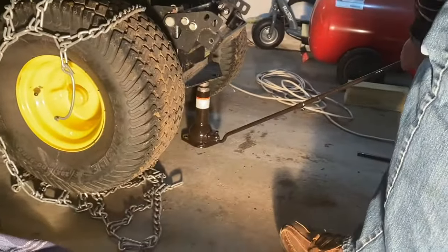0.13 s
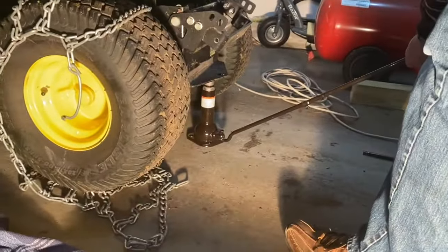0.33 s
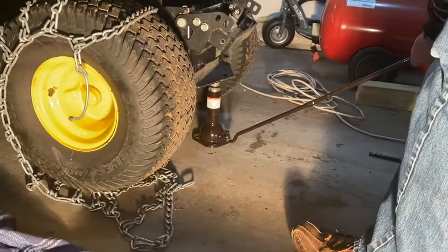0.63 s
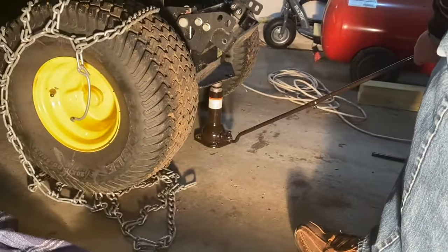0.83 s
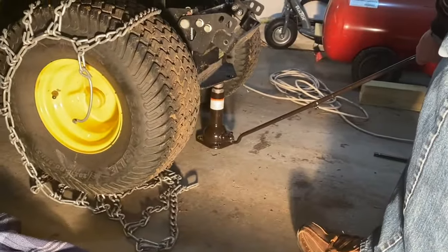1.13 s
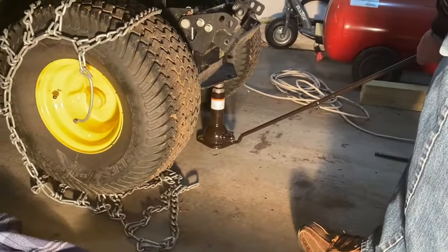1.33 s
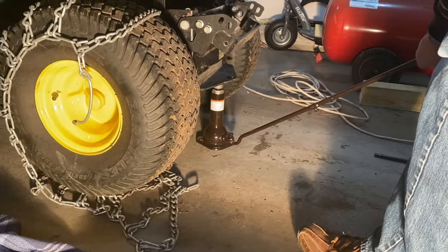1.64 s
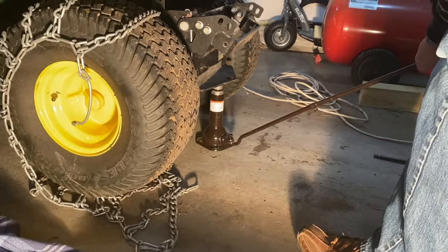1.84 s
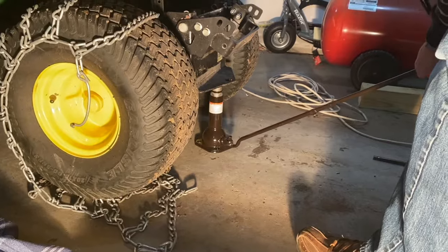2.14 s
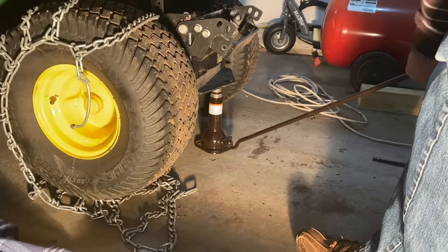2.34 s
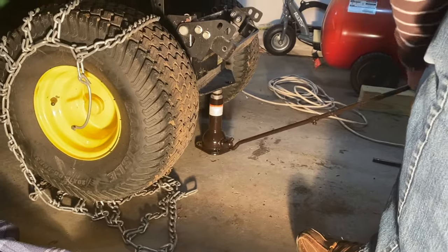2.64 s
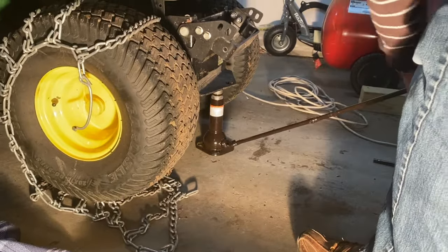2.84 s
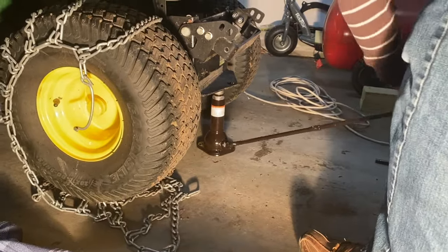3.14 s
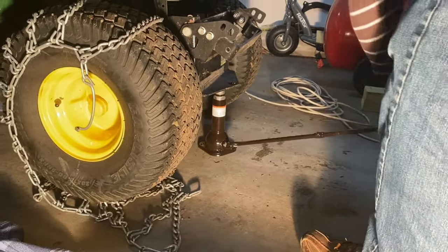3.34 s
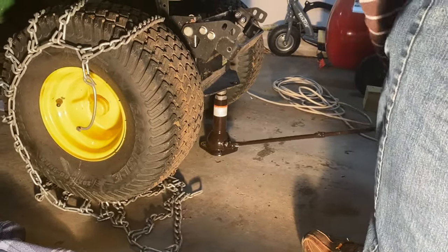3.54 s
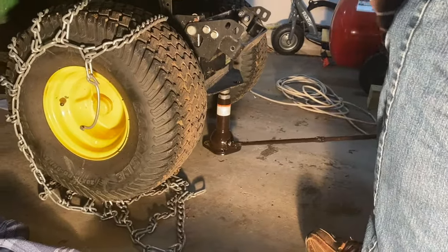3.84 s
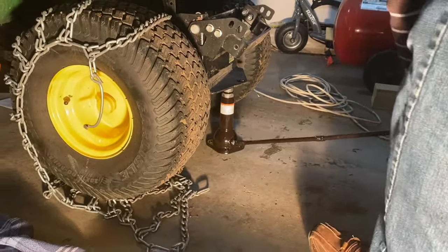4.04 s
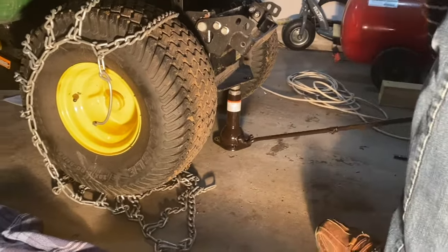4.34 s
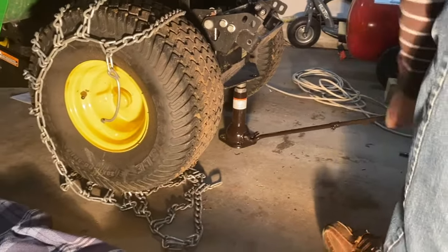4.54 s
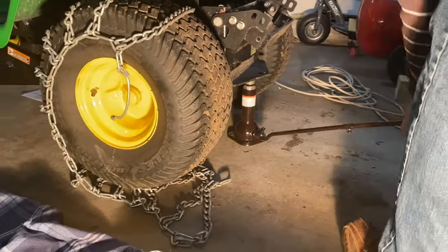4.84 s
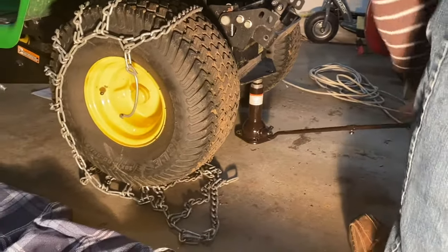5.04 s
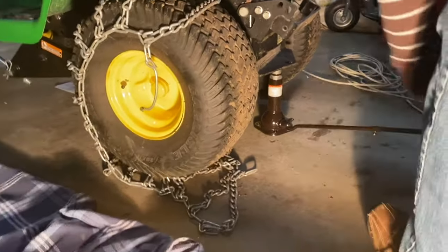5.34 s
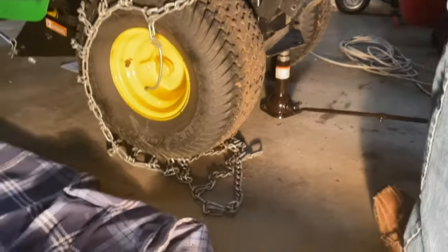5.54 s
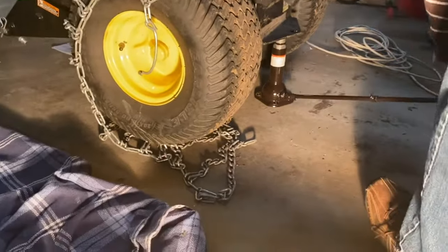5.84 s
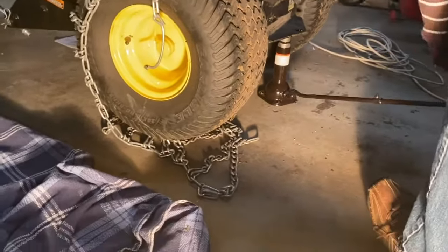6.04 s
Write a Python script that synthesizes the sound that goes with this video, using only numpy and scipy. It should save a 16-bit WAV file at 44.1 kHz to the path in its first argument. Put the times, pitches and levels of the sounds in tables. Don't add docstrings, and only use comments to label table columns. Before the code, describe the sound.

In an open concrete garage, a bottle jack is pumped with dull metallic knocks and small ticks. A bright, hard slam of the handle in its socket follows, with a short rattle. After a quieter gap, the handle taps and clunks on concrete, with scraping, clothes rustling and low knee or shoe thumps. Far traffic hums. A small stereo camera microphone sits close by, catching dense wall echoes.

```python
import sys
import numpy as np
from scipy import signal
from scipy.io import wavfile

SR = 44100
rng = np.random.default_rng(int(sys.argv[2]) if len(sys.argv) > 2 else 0)


def decibels_to_gain(level_db):
    exponent = np.asarray(level_db, float) / 20
    return 10 ** exponent


def wav_out(sig):
    wavfile.write(sys.argv[1], SR, np.round(np.clip(np.atleast_2d(sig).T, -1, 1) * 32767).astype(np.int16))


N = 272317
LEAD = 2048

# start_s, knock_db, tick_db, hardness_db_per_octave, echo_db
EARLIER_BLOW = [(-0.015, -37.5, -32.5, 6.5, -1)]
PUMP_BLOWS = [(0.3902, -41, -52.5, 6.5, -0.5), (0.5793, -56.5, -90, 11, 8.5), (0.9294, -51.5, -78, 9, 6),
              (0.9949, -41.5, -63.5, -6, -3), (1.0535, -46, -89, -5, -8), (1.5374, -49, -71, 6, 0.5)]
LINKAGE_BLOWS = [(0.4967, -65, -71.5, 20.5, 6.5), (1.3004, -70, -60.5, 6, 4.5),
                 (1.3802, -42, -45.5, 1.5, -0.04)]
SLAM_BLOW = [(1.7808, -41, -24.5, 9, 5)]
RATTLE_BLOWS = [(1.991, -73, -52.5, 6, 7), (2.0457, -53.5, -48.5, 2.2, -1), (2.1041, -52, -49, 5, -1),
                (2.2079, -61, -55.5, 5, -1)]
LAYING_BLOWS = [(2.9921, -63, -66, -5, 1), (3.019, -67, -65.5, 5, 3), (3.0689, -70, -72, 2.5, 1.5),
                (3.1424, -55, -77, 6, 1.5), (3.2049, -77, -63.5, 0, 2), (3.2226, -78, -56, -3, -1.5),
                (3.32, -82, -63.5, -4, -3), (3.6579, -60, -61.5, 4, -0.5), (3.7206, -65.5, -80, -16, -2),
                (4.02, -33.5, -33.5, -2, -1.5), (4.268, -65, -64, 2, 4), (4.6195, -56, -58.5, 19, 4),
                (4.8148, -76, -63, 0, 0), (4.8324, -85, -63.5, 1, 4.5), (4.8856, -55.5, -86, 3, 4),
                (4.9143, -45, -75, 14, -6), (5.004, -82, -64.5, 2, 2.5), (5.0296, -59, -67, -1, -5.5),
                (5.1205, -48, -56.5, 0.5, -9.5),
                (3.456, -63, -51, -2, 7), (3.483, -40.5, -46, -4, -12), (3.571, -77, -69, 8, 4),
               (4.006, -44.5, -54.5, 4, 1.5), (4.469, -65, -77, 7, 0)]

# pitch_hz, level_db, t60_s
JACK_MODES = [(517, -1, .1), (692, -4, .08), (1130, -1, .05), (1464, 5, .06), (1950, 0, .05),
              (2480, 8, .05), (2620, 8, .04), (2900, 2, .03), (3550, -2, .03), (4100, -3, .025),
              (6050, -8, .04)]
LINK_MODES = [(692, -5, .06), (1130, -4, .04), (2310, 0, .03), (3450, 4, .025), (3640, 7, .03),
              (5080, 8, .035), (5300, 7, .03), (6860, 0, .025), (7600, 0, .02), (9500, -2, .02),
              (10830, -3, .02)]
SOCKET_MODES = [(517, -2, .1), (690, -4, .1), (1464, 7, .05), (1800, 5, .035), (3440, 6, .04),
                (4770, 3, .05), (5012, 1, .08), (5670, 1, .045), (5945, 2, .06), (6600, 4, .015),
                (10036, -3, .06), (10440, 16, .02), (11340, 6, .04), (14100, 4, .03)]
LYING_MODES = [(517, -4, .08), (694, 0, .09), (900, -2, .03), (1416, 3, .04), (1640, 2, .025),
               (2180, 0, .025), (2500, 1, .025), (2850, 4, .035), (3400, 4, .025), (3750, 3, .025),
               (4500, 0, .025), (10800, -4, .015)]

# low_hz, high_hz
CRACK_BANDS = [(4500, 8000), (480, 1500), (1500, 4500), (8000, 15500)]
CRACK_PEAK_DB = [.1, 6, 1.4, 0.88]
KNOCK_HZ, KNOCK_FALL_DB_PER_OCTAVE = 670, 14.5
TICK_HZ, TICK_CUT_DB = 6000, 42
SIDE_SHARE = .6

# pitch_hz, density_db_per_hz
HUM_SPECTRUM = [(15, -38), (25, -11.5), (63, 7), (157, -5.5), (299, -2.5), (418, -9), (706, -13.5),
                (835, -18), (1250, -17.5), (1450, -13), (2020, -29.5), (5910, -41.5), (7500, -50),
                (9750, -81), (16500, -120)]
# time_s, level_db
HUM_SWELL = [(0.0, -57.5), (0.36, -60.5), (0.57, -58.5), (0.76, -60.5), (1.44, -61), (1.7, -58.5),
             (2.1, -56.5), (2.51, -64.5), (2.84, -63), (3.08, -59), (3.95, -61.5), (4.21, -59),
             (5.16, -60.5), (5.33, -65), (6.05, -60.5), (6.17, -61)]
# pitch_hz, width_hz, level_db
HUM_RESONANCES = [(70, 25, -84.5), (161, 24, -66), (1485, 250, -74)]
HISS_DB = -85

# start_s, level_db, pitch_hz, t60_s
KNEE_THUMPS = [(0.537, -40.5, 125, 0.036), (2.509, -45, 143, 0.033), (2.693, -48, 135, 0.025),
               (2.838, -47, 227, 0.035), (5.309, -44, 130, .03), (5.583, -49.5, 128, 0.026),
               (5.624, -44, 130, 0.024), (5.126, -34.5, 103, 0.029)]

# start_s, held_s, level_db
DRAG_STROKES = [(2.67, 0.1, -70), (2.84, .13, -74), (3.69, 0.18, -64.5), (3.99, 0.025, -65.5),
                (4.475, 0.052, -54), (4.535, 0.02, -48), (4.59, 0.094, -48.5), (4.76, 0.025, -64),
                (4.91, 0.017, -75), (5.03, .09, -66.5), (5.25, 0.026, -81), (5.5, 0.098, -69.5),
                (5.73, 0.048, -68), (5.95, 0.022, -77), (6.07, 0.11, -74)]
DRAG_RISE_DB_PER_S, DRAG_FALL_DB_PER_S = 450, 143
# pitch_hz, density_db_per_hz
SCRAPE_SPECTRUM = [(150, -64), (250, -5), (373, -14.5), (441, -3), (576, -7), (690, -1.5), (901, -10.5),
                   (1480, -7.5), (2340, -9.5), (2550, -13.5), (4500, -21), (5850, -49.5), (9900, -120)]
# start_s, held_s, level_db
RUSTLE_STROKES = [(2.67, 0.088, -74.5), (2.97, .02, -76), (3.55, 0.015, -61), (3.66, .22, -73.5),
                  (3.99, .02, -78), (4.4, 0.024, -71.5), (4.5, .21, -58), (4.8, 0.026, -65.5),
                  (4.97, 0.0077, -71.5), (5.09, 0.14, -67.5), (5.21, 0.036, -61.5), (5.44, .03, -75.5),
                  (5.5, 0.029, -68), (5.615, .01, -78.5), (5.68, 0.0072, -77), (5.78, 0.018, -72.5),
                  (5.87, .03, -76), (5.95, 0.0088, -68), (6.065, 0.0087, -74.5), (6.165, 0.016, -70)]
RUSTLE_RISE_DB_PER_S, RUSTLE_FALL_DB_PER_S = 233, 182
# pitch_hz, density_db_per_hz
CLOTH_SPECTRUM = [(1060, -29.5), (1800, -3.5), (2820, -8.5), (6470, -2.5), (10300, -6), (12100, -5.5),
                  (13900, -2.5), (16000, -20)]

# pitch_hz, t60_s, level_db
GARAGE_ECHO = [(198.7, 0.65, 9.5), (430, 0.81, 2), (700, 0.61, 0), (1400, 0.55, -3.9), (3996, 0.66, -3.4),
               (7300, 0.45, -8), (10100, 0.33, -12.5), (14000, 0.36, 3.5)]
ECHO_DB, ECHO_RISE_S = -25, 0.002
# pitch_hz, likeness (-1 to 1)
PORT_LIKENESS = [(60, 0.87), (180, 1), (550, 0.64), (1650, 0.32), (4970, 0.12), (15000, 0.23)]

# pitch_hz, width_hz
TREBLE_DIPS = [(8600, 550), (12050, 1350)]
DIP_FLOOR_DB = -27.5
LIFT_HZ, LIFT_WIDTH_HZ, LIFT_DB = 13900, 1300, -5.5
TILT_DB, TOP_HZ, BASS_HZ = -.5, 15000, 38


def rms_one(x):
    return x / np.sqrt(np.mean(x ** 2) + 1e-20)


def at_hz(points, hz, column=1):
    points = np.array(points)
    return np.interp(np.log(hz), np.log(points[:, 0]), points[:, column])


def band(x, low_hz, high_hz):
    return signal.sosfilt(signal.butter(2, [low_hz, high_hz], "band", fs=SR, output="sos"), x)


def drift(rate_hz):
    r = np.exp(-80 * np.pi * rate_hz / SR)
    noise = rng.standard_normal(N // 40 + 2002)
    slow = signal.lfilter([1], [1, -2 * r, r * r], noise)[2000:]
    return np.interp(np.arange(N) / 40, np.arange(len(slow)), rms_one(slow))


def ring(clicks, hz, t60):
    r, w = decibels_to_gain(-60 / (t60 * SR)), 2 * np.pi * hz / SR
    return signal.lfilter([0, np.sin(w)], [1, -2 * r * np.cos(w), r * r], clicks + 1e-18)


def banded(source, spectrum, gain_at):
    out = 0
    edges = 25 * 2 ** (np.arange(29) / 3)
    for k, (low, high) in enumerate(zip(edges, edges[1:])):
        hz = np.sqrt(low * high)
        if spectrum[0][0] <= hz <= spectrum[-1][0]:
            mid, side = band(source[k % 2], low, high)
            alike = np.clip(at_hz(PORT_LIKENESS, hz), -1, 1)
            stereo = np.sqrt(1 + alike) * mid + np.sqrt(1 - alike) * side * [[1], [-1]]
            out = out + gain_at(hz) * stereo
    return out


def colours(rows, hz):
    knock = rows[:, 1:2] - KNOCK_FALL_DB_PER_OCTAVE * np.maximum(np.log2(hz / KNOCK_HZ), 0)
    tick = rows[:, 2:3] + rows[:, 3:4] * np.log2(hz / TICK_HZ)
    tick = tick - TICK_CUT_DB * (hz < 2 * KNOCK_HZ)
    return 10 * np.log10(decibels_to_gain(2 * knock) + decibels_to_gain(2 * tick))


def blows(rows, modes, crack_s, crack_db, ring_db, spread_db, beam_db):
    rows = np.array(rows)
    at = np.round(rows[:, 0] * SR).astype(int) + LEAD
    order = np.argsort(CRACK_BANDS, axis=0)[:, 0]
    squared_hz = np.prod(CRACK_BANDS, axis=1)
    centres = np.log(squared_hz[order]) / 2
    levels = colours(rows, np.sqrt(squared_hz))
    direct = rows[:, 0] >= 0
    send = np.stack([direct, decibels_to_gain(rows[:, 4])])
    t = np.arange(1500) / SR
    burst = rng.standard_normal((len(at), 2, len(t))) * t * np.exp(-t / crack_s)
    chance = rng.standard_normal((len(at), len(modes)))
    out = np.zeros((3, N + LEAD))

    for k, (low, high) in enumerate(CRACK_BANDS):
        sign = (-1) ** np.argmax(order == k)
        crack = sign * band(burst, low, high)
        crack = crack / np.abs(crack).max(axis=(1, 2), keepdims=True)
        snap = sign * rms_one(band(t == 0, low, high))
        for i, shape, row, (near, far) in zip(at, crack, levels, send.T):
            gain = decibels_to_gain(row[k] + CRACK_PEAK_DB[k] + crack_db)
            out[:2, i:i + len(t)] += gain * near * shape * [[1], [SIDE_SHARE]]
            out[2, i:i + len(t)] += gain * far * snap * np.std(shape[0])

    after = np.arange(SR // 6) / SR
    contact = -np.expm1(-after / .0006)
    for m, (hz, mode_db, t60) in enumerate(modes):
        colour = np.array([np.interp(np.log(hz), centres, row[order]) for row in levels])
        strength = send * decibels_to_gain(colour + mode_db + ring_db + spread_db * chance[:, m])
        rung = ring(after == 0, hz, t60) * contact
        aside = SIDE_SHARE * np.sin(hz / 1110)
        beamed = decibels_to_gain(-beam_db * hz / 10000)
        for i, (near, far) in zip(at, strength.T):
            out[:, i:i + len(rung)] += rung * [[near], [near * aside], [far * beamed]]
    return out


def pump_strokes():
    return blows(EARLIER_BLOW + PUMP_BLOWS, JACK_MODES,
                 crack_s=.002, crack_db=-3.5, ring_db=-8.0, spread_db=5.0, beam_db=1.5)


def garage(x):
    t = np.arange(SR) / SR

    def decay(hz):
        return decibels_to_gain(at_hz(GARAGE_ECHO, hz, column=2) - 60 * t / at_hz(GARAGE_ECHO, hz))

    tail = banded(rng.standard_normal((2, 2, SR)), GARAGE_ECHO, decay)
    tail = tail * -np.expm1(-t / ECHO_RISE_S)
    return decibels_to_gain(ECHO_DB) * signal.fftconvolve(x[None], tail, axes=1)[:, :len(x)]


def hum():
    swell_db = np.interp(np.arange(N) / SR, *np.transpose(HUM_SWELL))
    noise = banded(rng.standard_normal((2, 2, N)), HUM_SPECTRUM,
                   lambda hz: decibels_to_gain(at_hz(HUM_SPECTRUM, hz) + .9 * drift(12)))
    out = decibels_to_gain(swell_db) * rms_one(noise)
    for hz, width_hz, level_db in HUM_RESONANCES:
        shared = rng.standard_normal(N)
        source = shared + 0.65 * rng.standard_normal((2, N))
        out = out + decibels_to_gain(level_db) * rms_one(band(source, hz - width_hz / 2, hz + width_hz / 2))
    return out + decibels_to_gain(HISS_DB) * rng.standard_normal((2, N))


def linkage_play():
    return blows(LINKAGE_BLOWS, LINK_MODES,
                 crack_s=.0013, crack_db=-.5, ring_db=-8.5, spread_db=1.2, beam_db=0)


def thumps():
    out = np.zeros(N)
    first = np.arange(SR // 5) == 0
    for s, level_db, hz, t60 in KNEE_THUMPS:
        out[round(s * SR):][:len(first)] += ring(decibels_to_gain(level_db) * first, hz, t60)
    return band(out, 48, 720)


def socket_slam():
    return blows(SLAM_BLOW, SOCKET_MODES,
                 crack_s=0.00092, crack_db=1.5, ring_db=-8.5, spread_db=1.3, beam_db=13.5)


def socket_rattle():
    return blows(RATTLE_BLOWS, LINK_MODES,
                 crack_s=0.0017, crack_db=1.0, ring_db=-21, spread_db=12.5, beam_db=18.0)


def grains(per_s, size_db):
    shape = (2, 2, N)
    sizes = decibels_to_gain(size_db * np.minimum(rng.exponential(1, shape), 5))
    sizes = sizes * rng.choice([-1, 1], shape)
    return rms_one(sizes * (rng.random(shape) < per_s / SR))


def strokes(rows, rise_db_per_s, fall_db_per_s):
    t = np.arange(0, N / SR + .002, .001)
    power = 0
    for s, held, level_db in rows:
        rise_db = rise_db_per_s * np.maximum(s - t, 0)
        fall_db = fall_db_per_s * np.maximum(t - s - held, 0)
        power = power + decibels_to_gain(2 * (level_db - rise_db - fall_db))
    return np.interp(np.arange(N) / SR, t, np.sqrt(power))


def rubbing(spectrum, gain, per_s, rough_db):
    source = grains(per_s, size_db=2.5)
    noise = rms_one(banded(source, spectrum, lambda hz: decibels_to_gain(at_hz(spectrum, hz))))
    return noise * gain * decibels_to_gain(rough_db * drift(33))


def drags():
    gain = strokes(DRAG_STROKES, DRAG_RISE_DB_PER_S, DRAG_FALL_DB_PER_S)
    return rubbing(SCRAPE_SPECTRUM, gain, per_s=8000, rough_db=1.1)


def rustles():
    gain = strokes(RUSTLE_STROKES, RUSTLE_RISE_DB_PER_S, RUSTLE_FALL_DB_PER_S)
    return rubbing(CLOTH_SPECTRUM, gain, per_s=9000, rough_db=1.5)


def handle_laid_down():
    return blows(LAYING_BLOWS, LYING_MODES,
                 crack_s=0.0017, crack_db=2.5, ring_db=-3.5, spread_db=2.5, beam_db=30.0)


def scene():
    struck = pump_strokes() + linkage_play() + socket_slam() + socket_rattle() + handle_laid_down()
    mid, side, sent = struck
    steel = mid + side * [[1], [-1]] + garage(sent)
    return steel[:, LEAD:] + hum() + thumps() + drags() + rustles()


def low_pass(x):
    return signal.sosfilt(signal.butter(12, 16650, fs=SR, output="sos"), x)


def record(dry):
    for hz, width_hz in TREBLE_DIPS:
        edges = [hz - width_hz / 2, hz + width_hz / 2]
        cut = signal.sosfilt(signal.butter(4, edges, "bandstop", fs=SR, output="sos"), dry)
        dry = cut + decibels_to_gain(DIP_FLOOR_DB) * dry
    peak = signal.lfilter(*signal.iirpeak(LIFT_HZ, LIFT_HZ / LIFT_WIDTH_HZ, fs=SR), dry)
    dry = dry + decibels_to_gain(LIFT_DB) * peak
    dry = signal.sosfilt(signal.cheby1(10, 1, TOP_HZ, fs=SR, output="sos"), dry)
    dry = signal.sosfilt(signal.butter(2, BASS_HZ, "high", fs=SR, output="sos"), dry)
    dry = np.stack([dry[0], np.roll(dry[1], 1)])
    mix = dry * decibels_to_gain([[TILT_DB], [-TILT_DB]])
    return low_pass(mix)


dry = scene()
out = record(dry)
wav_out(out)
```